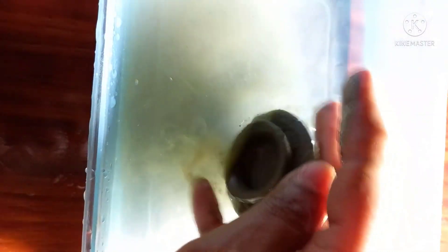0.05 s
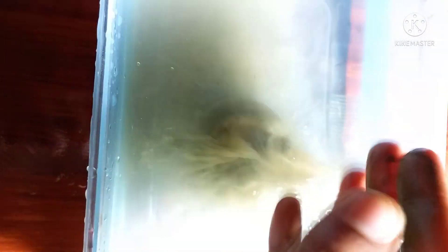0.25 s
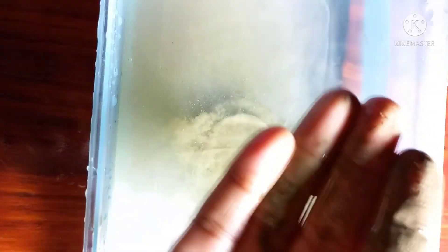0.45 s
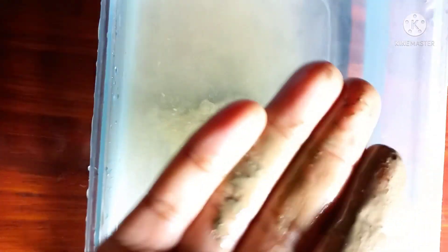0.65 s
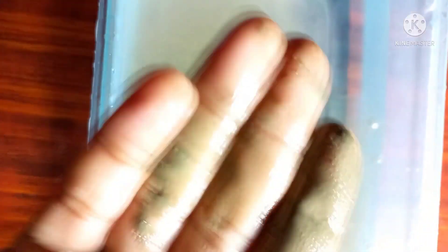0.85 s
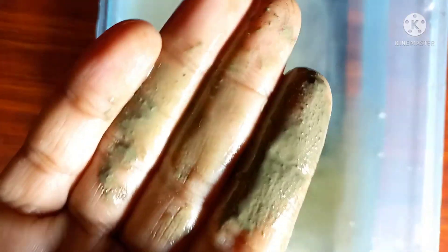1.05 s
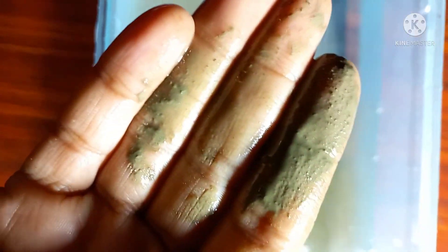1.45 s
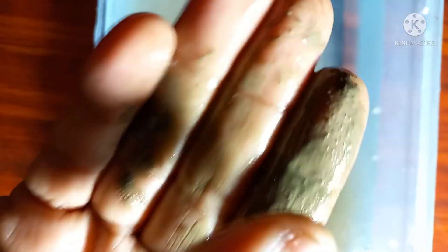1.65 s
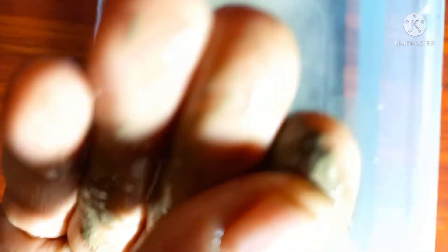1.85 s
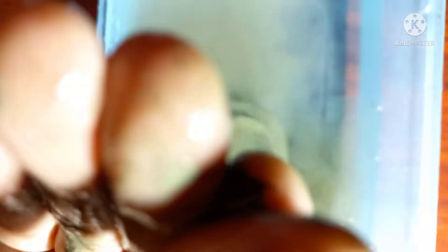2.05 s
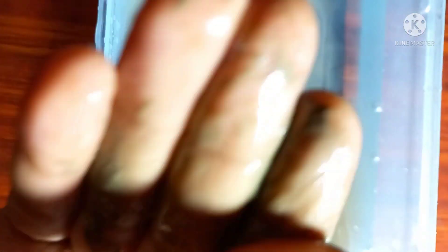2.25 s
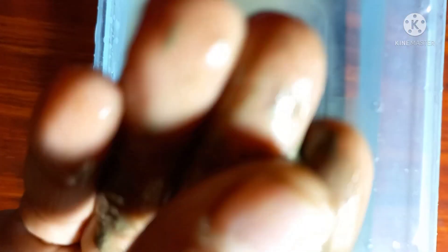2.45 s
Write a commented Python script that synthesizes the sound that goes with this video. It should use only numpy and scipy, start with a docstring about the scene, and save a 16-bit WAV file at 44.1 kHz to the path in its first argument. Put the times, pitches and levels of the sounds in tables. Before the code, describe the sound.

At about 0.25 seconds a lump of clay plops into a plastic tub of water, with a knock, a sharp splash and a deep gulp. Bubbles and a low boom fade by 0.5 seconds. From 0.6 to 1.1 seconds a wet hand slides softly, making the tub drone. Sticky fingers then tick very faintly until about 2.3 seconds over a low room hum.

```python
"""A slap, a knock and a deep gulp: a lump of clay drops into a plastic tub of water in a small room.
The clay rings the tub wall, the air pocket behind it closes with a splash and a churn of bubbles,
and the filled tub booms. Then a wet hand slides past, its friction setting the tub droning,
and sticky fingers tick faintly over a low room hum."""
import sys
import numpy as np
from scipy import signal
from scipy.fft import rfft, irfft
from scipy.io import wavfile

SR = 44100
rng = np.random.default_rng(int(sys.argv[2]) if len(sys.argv) > 2 else 0)


def dump_mix(stems):
    """Bounce the given channels to the path in sys.argv[1] as a 16-bit WAV at rate SR."""
    frames = np.atleast_2d(stems).T  # one column per channel
    limited = np.clip(frames, -1, 1)  # hard clip at full scale
    pcm = np.round(limited * 32767).astype(np.int16)
    wavfile.write(sys.argv[1], SR, pcm)


N = 114660
T = np.arange(N) / SR
FREQS = np.fft.rfftfreq(N, 1 / SR)
BOOM_HZ = 121.3  # lowest mode of the filled tub


def knocks():
    """Each contact of the clay rings the tub wall; the first, at the surface, is softest and dullest."""
    # surface, bottom, settling: t/s, level/dB, contact cut-off f/Hz
    contacts = [(0.2283, -24.5, 1306), (0.2659, -14.5, 2400), (0.2795, -21, 2570)]
    # wall modes: f/Hz, level/dB, t60/s
    wall_modes = [(387, -14.5, 0.11), (485, -8.5, 0.021), (574, -4.5, 0.029), (755, -8, 0.062),
                  (1092, -1, .025), (1336, -2.5, 0.041), (1527, -4, 0.034), (1670, -4.5, 0.015),
                  (2047, -11, .02)]
    out = np.zeros(N)
    for start, db, cutoff_hz in contacts:
        for k, (hz, mode_db, t60) in enumerate(wall_modes):
            gain = from_db(db + mode_db + rng.normal(0, 1.2)) / (1 + (hz / cutoff_hz) ** 2)
            out += (-1) ** k * gain * strike(start, t60) * np.sin(2 * np.pi * hz * (T - start))
    return out


def gulps():
    """An air pocket swells, rings and sags in pitch as it deepens."""
    # air pockets: t/s, peak level/dB, starting f/Hz, swell/s, t60/s
    pockets = [(0.229, -15.5, 286.5, .007, 0.014), (0.266, -13, 300.6, 0.0096, 0.11)]
    sag_oct_per_s = 14
    out = np.zeros(N)
    for start, db, hz, swell, t60 in pockets:
        age = np.maximum(T - start, 0)
        pitch = hz * 2 ** (-sag_oct_per_s * age)
        phase = 2 * np.pi * np.cumsum(pitch * (T >= start)) / SR
        envelope = np.where(age < swell, age / swell, strike(start + swell, t60))
        out += from_db(db) * envelope * np.sin(phase)
    return out


def boom():
    """The mass of water swings on the springy tub: a wavering low tone with a faint octave."""
    # boom envelope: t/s, level/dB
    envelope = [(0.2255, -66), (0.236, -25), (0.254, -14.5), (0.29, -20.5), (0.325, -14), (0.366, -22),
                (0.412, -18.5), (0.453, -27), (0.48, -36), (0.55, -54)]
    pitch = BOOM_HZ * (1 + 0.022 * drift(40))
    phase = 2 * np.pi * np.cumsum(pitch * (T >= envelope[0][0])) / SR
    return np.sqrt(2) * gesture(envelope) * (np.sin(phase) + from_db(-28) * np.sin(2 * phase))


def slaps():
    """The water closes behind the clay with sharp slaps."""
    # slap hits: t/s, level/dB
    hits = [(0.2752, -22), (0.2771, -19.5), (0.2794, -25.5)]
    # slap EQ: f/Hz, level/dB
    colour = [(100, -18), (1200, -7.5), (2000, -3.5), (3000, -1.5), (4300, 1), (5800, -2), (7500, -13.5),
              (10500, -21.5), (14000, -15.5), (16000, -22)]
    return cracks(hits, colour, t60=0.0053)


def churn():
    """Many small bubbles ring briefly, each pitch from its own place in the tub."""
    # churned water after the entry: t/s, level/dB
    envelope = [(0.229, -46), (0.263, -42), (0.272, -25), (0.3, -35.5), (0.36, -40), (0.42, -46),
                (0.48, -58), (0.56, -72)]
    # bubble weight by pitch: f/Hz, level/dB
    colour = [(380, 1), (600, -2), (900, -5.5), (1300, -18.5), (1800, -6), (2800, -19.5)]
    pitches, bubbles_per_s, t60_cycles, spread_db = 24, 2800, 13.64, 3
    pitch_index = rng.integers(0, pitches, N)
    born = rng.random(N) < bubbles_per_s / SR
    kicks = born * from_db(spread_db * rng.standard_normal(N)) * rng.choice([-1, 1], N)
    out = np.zeros((2, N))
    for k, hz in enumerate(np.geomspace(colour[0][0], colour[-1][0], pitches)):
        radius = np.exp(-np.log(1000) * hz / (t60_cycles * SR))
        angle = 2 * np.pi * hz / SR
        poles = [1, -2 * radius * np.cos(angle), radius ** 2]
        ring = signal.lfilter([0, np.sin(angle)], poles, kicks * (pitch_index == k) + 1e-18)
        left_lag = int(SR * rng.uniform(0, 0.0006))
        out += from_db(at_hz(colour, hz)) * np.array([np.roll(ring, left_lag), ring])
    return gesture(envelope) * rms_one(out)


def slide():
    """Grainy friction of the moving hand: a soft body and a thin, wide rasp."""
    # body envelope: t/s, level/dB
    body_envelope = [(0.545, -74), (0.59, -54.5), (0.67, -50.5), (0.72, -56), (0.78, -53.5), (0.875, -49.5),
                     (0.915, -45.5), (0.957, -44), (0.985, -55), (1.07, -68)]
    # body EQ: f/Hz, level/dB
    body_colour = [(150, -13.5), (300, -4.5), (560, -5.5), (800, -8), (1200, 1), (1550, -6.5),
                   (1900, -16.5), (3000, -49), (8000, -68)]
    # rasp envelope: t/s, level/dB
    rasp_envelope = [(0.535, -83), (0.575, -64.5), (0.63, -68), (0.675, -63), (0.725, -67), (0.775, -64),
                     (0.885, -67), (0.92, -56), (0.958, -55), (0.985, -74)]
    # rasp EQ: f/Hz, level/dB
    rasp_colour = [(1000, -35), (2000, -2), (2250, -8), (2700, 1), (3000, -4), (3400, 0), (3950, -17),
                   (4700, -5), (5900, -13.5), (8500, -6.5), (11500, -14), (15000, -20)]
    grain_db, focused_share, lag_s = 1.5, 0.43, 0.000415
    grain = rms_one(from_db(grain_db * drift(200)))
    wide = np.array([noise(rasp_colour), noise(rasp_colour)])
    focused = place(noise(rasp_colour), lag_s)
    rasp = np.sqrt(focused_share) * focused + np.sqrt(1 - focused_share) * wide
    body = place(noise(body_colour), lag_s)
    return grain * (gesture(body_envelope) * body + gesture(rasp_envelope) * rasp)


def drone():
    """The hand's friction stirs the lowest mode of the tub."""
    # drone envelope: t/s, level/dB
    envelope = [(0.55, -66), (0.68, -60), (0.76, -41), (0.86, -40.5), (0.93, -32), (0.98, -38.5),
                (1.15, -53)]
    b, a = signal.iirpeak(BOOM_HZ, BOOM_HZ / 33, fs=SR)  # 33 Hz wide per pass
    stirred = signal.lfilter(b, a, rng.standard_normal(N))
    return gesture(envelope) * rms_one(signal.lfilter(b, a, stirred))


def ticks():
    """Droplets and sticky wet skin make tiny bright ticks."""
    # tick hits: t/s, level/dB
    hits = [(0.1131, -58), (0.155, -54), (0.2355, -40), (0.2393, -40), (0.3516, -38), (0.8525, -54),
            (1.2191, -60), (1.4436, -63), (1.6402, -63), (2.007, -62), (2.299, -63)]
    # tick EQ: f/Hz, level/dB
    colour = [(2000, -18), (5000, -9), (8500, 3), (11000, -7), (13500, -1), (16000, -9)]
    return cracks(hits, colour, t60=0.0087)


def release():
    """Wet skin peels off the clay with a faint, grainy rustle."""
    # fingers letting go: t/s, level/dB
    envelope = [(0.0, -78.5), (0.06, -75), (0.12, -77), (0.16, -77), (0.2, -81), (0.235, -67), (0.26, -73)]
    # rustle EQ: f/Hz, level/dB
    colour = [(1500, -14), (3500, -1), (5800, -12.5), (8300, 4), (11000, -8.5), (15000, -3)]
    return gesture(envelope) * rms_one(noise(colour) * from_db(5.4 * drift(400)))


def room(send):
    """The small room answers with a diffuse tail that dies band by band."""
    # decay curve, read only at the band centres: f/Hz, t60/s
    decay = [(150, 0.18), (300, 1.32), (600, -0.03), (1300, 0.66), (3000, -0.05), (6000, 0.67),
             (14000, 0.5)]
    # reverb EQ: f/Hz, level/dB
    colour = [(100, -13), (280, -7), (600, -1.5), (1300, -4), (2000, 2), (3200, -5), (6000, -9),
              (14000, -3.5)]
    field = diffuse_spectrum() * eq(colour)
    build_up = 1 - np.exp(-T / 0.0026)
    centres = np.geomspace(100, 14000, 9)
    tail = 0
    for centre, share in zip(centres, np.eye(len(centres))):
        band = irfft(field * at_hz(np.c_[centres, share], FREQS), N)
        fade = strike(0, at_hz(decay, centre)) * build_up
        tail = tail + band * fade / np.sqrt(2 * np.sum(fade ** 2))
    return signal.fftconvolve(tail, send[None], axes=1)[:, :N]


def background():
    """Room tone: air, a wavering hum and a low rumble that comes and goes."""
    # air EQ: f/Hz, level/dB
    air_colour = [(25, -28), (45, -21), (75, -1.5), (150, 3.5), (200, -7.5), (300, -8.5), (345, -12),
                  (410, -11.5), (520, -21.5), (660, -27), (1200, -29.5), (1800, -36), (3000, -41.5),
                  (6000, -49), (7500, -48), (8700, -43), (9800, -51.5), (15500, -47)]
    # rumble envelope: t/s, level/dB
    rumble_envelope = [(0, -45.5), (0.5, -43.5), (0.8, -53), (1.18, -51.5), (1.32, -42.5), (1.53, -41.5),
                       (1.59, -48.5), (1.74, -42.5), (1.93, -56.5), (2.2, -45), (2.6, -65)]
    # rumble EQ: f/Hz, level/dB
    rumble_colour = [(25, -33), (50, -35), (76, 2.5), (100, -5), (125, -4.5), (170, -13.5), (300, -30),
                     (1000, -77.5)]
    air_db, hum_db, hum_hz = -48.5, -55, 274.4
    air = rms_one(irfft(diffuse_spectrum() * eq(air_colour), N))
    hum_phase = 2 * np.pi * hum_hz * T + 0.2 * drift(3.9)
    hum = np.sqrt(2) * np.sin(hum_phase) * from_db(0.5 * drift(8))
    rumble = level(rumble_envelope) * noise(rumble_colour)
    return from_db(air_db) * air + from_db(hum_db) * hum + rumble


def cracks(hits, colour, t60):
    """Each crack is one sharp pulse and a short fizz of equal energy."""
    bursts = rng.standard_normal(N) * sum(from_db(db) * strike(start, t60) for start, db in hits)
    for start, db in hits:
        bursts[int(start * SR)] += from_db(db) * np.sqrt(np.sum(strike(start, t60) ** 2))
    # minimum-phase EQ: nothing rings ahead of the attack
    cepstrum = irfft(np.log(rms_one(eq(colour))), N)
    response = np.exp(rfft(np.r_[cepstrum[0], 2 * cepstrum[1:N // 2]], N))
    return irfft(rfft(bursts) * response, N) / np.sqrt(2)


def diffuse_spectrum():
    """Spectrum of white stereo noise, near mono in the bass and wider above."""
    # likeness of the two sides: f/Hz, correlation
    likeness = [(100, 0.95), (250, 0.92), (400, .86), (700, 0.186), (1300, -0.0062), (3000, -0.22),
                (15000, 0.57)]
    mid, side = rfft(rng.standard_normal((2, N)))
    correlation = at_hz(likeness, FREQS)
    return np.sqrt(1 + correlation) * mid + np.sqrt(1 - correlation) * side * [[1], [-1]]


def place(x, lag_s, pan=((1000, 0), (10000, 0))):
    """Direct sound reaches the right side first; pan lifts the left and lowers the right."""
    gain = eq(pan)
    delay = np.exp(-2j * np.pi * FREQS * lag_s)
    return irfft(rfft(x) * np.array([gain * delay, 1 / gain]), N)


def from_db(db):
    """Decibels to gain."""
    return 10 ** (np.asarray(db) / 20)


def rms_one(x):
    """Scale to rms 1."""
    return x / np.sqrt(np.mean(x ** 2) + 1e-20)


def level(rows):
    """Gain over time from points of t/s, level/dB."""
    return from_db(np.interp(T, *np.transpose(rows)))


def gesture(rows):
    """A level curve that is silent outside its span."""
    return level(rows) * (T >= rows[0][0]) * (T <= rows[-1][0])


def strike(start, t60):
    """Envelope with an instant attack and an exponential decay."""
    return (T >= start) * np.exp(-np.log(1000) * np.clip((T - start) / t60, 0, 10))


def at_hz(points, hz):
    """Read a table on a log-frequency axis."""
    freqs, values = np.transpose(points)
    return np.interp(np.log(hz + 1), np.log(freqs), values)


def eq(colour):
    """Gain over frequency from points of f/Hz, level/dB."""
    return from_db(at_hz(colour, FREQS))


def noise(colour):
    """Steady noise of a given colour, rms 1."""
    return rms_one(irfft(rfft(rng.standard_normal(N)) * eq(colour), N))


def drift(rate):
    """Random modulation that glides to a new value rate times a second."""
    return np.interp(T * rate, np.arange(N), rng.standard_normal(N))


def scene():
    """The plop and the hand, close by, with room reverb and room tone."""
    # the spray's lean to the left: f/Hz, level/dB
    spray_pan = [(1500, 1.5), (2600, -2.5), (4400, 1.6), (8000, 2.6), (13000, .2)]
    knock, gulp, swing, hand = knocks(), gulps(), boom(), slide()
    spray = slaps() + ticks() + release()
    bass = (gulp + swing) * from_db([[0.63], [-0.63]]) + drone()  # gulp and boom sit slightly left
    direct = place(knock, lag_s=0.000377) + hand + place(spray, lag_s=0.00032, pan=spray_pan) + bass
    reverb = room(knock + gulp + spray + from_db(-1.5) * hand[1] + from_db(-1) * swing)
    return direct + reverb + background() + churn()


def record(dry):
    """A steep high cut, 60 dB down at 16.1 kHz."""
    return signal.sosfilt(signal.cheby2(16, 60, 16100, fs=SR, output="sos"), dry)


dry = scene()
out = record(dry)
dump_mix(out)
```